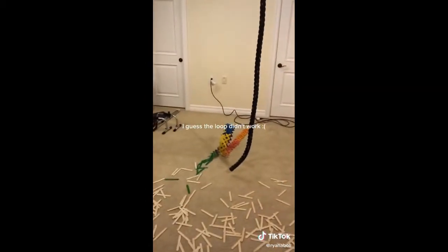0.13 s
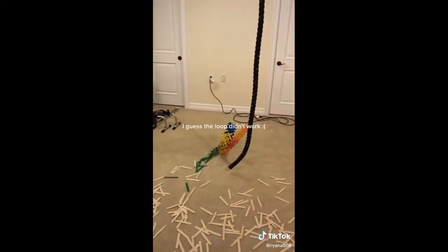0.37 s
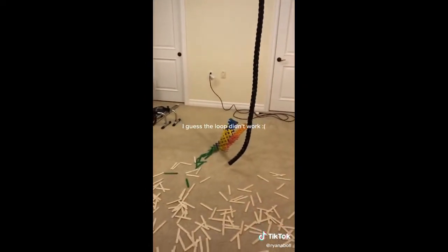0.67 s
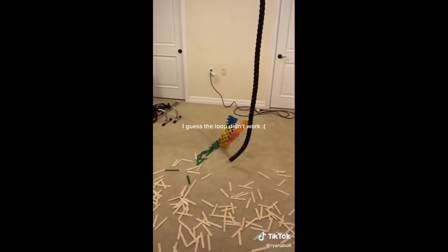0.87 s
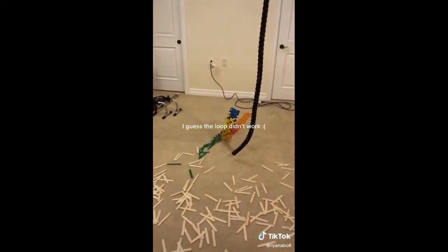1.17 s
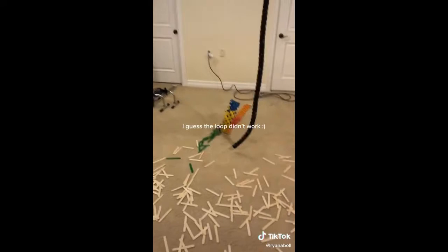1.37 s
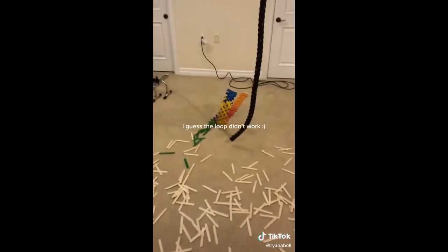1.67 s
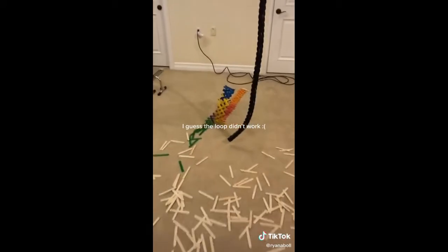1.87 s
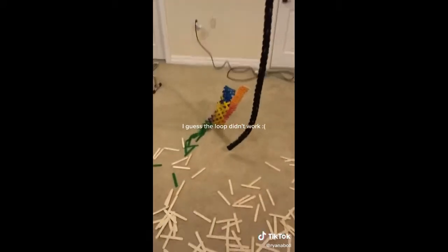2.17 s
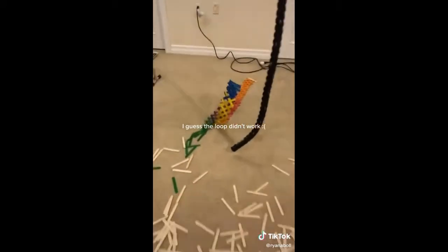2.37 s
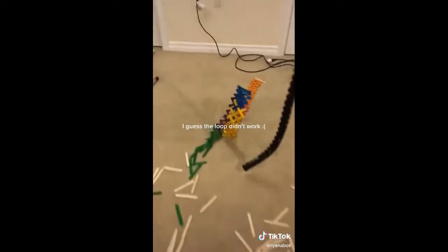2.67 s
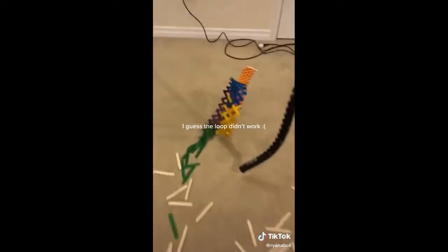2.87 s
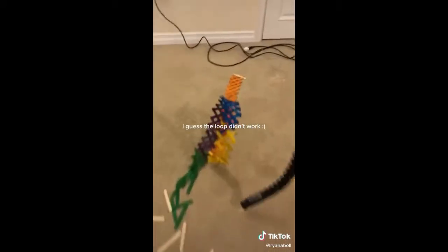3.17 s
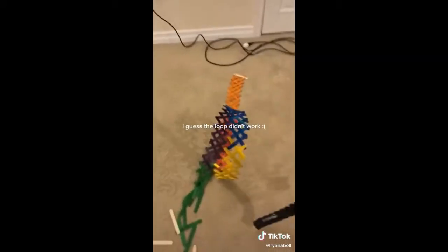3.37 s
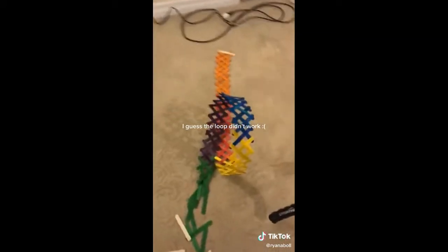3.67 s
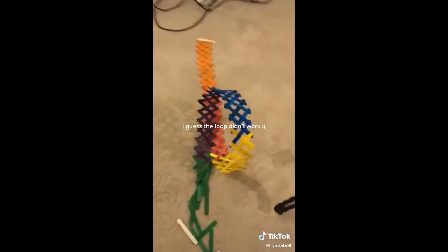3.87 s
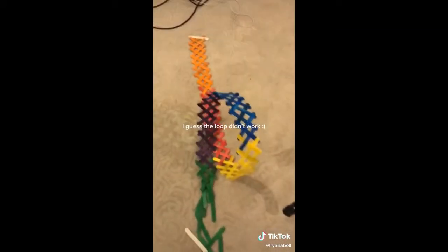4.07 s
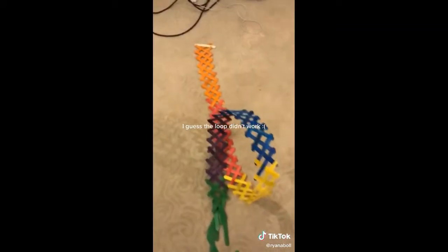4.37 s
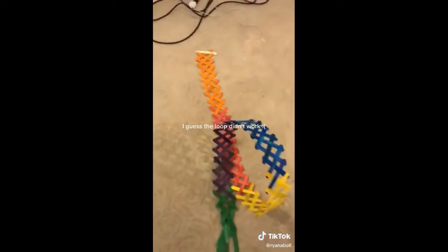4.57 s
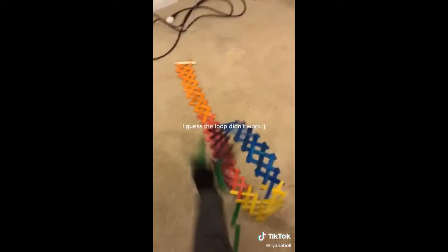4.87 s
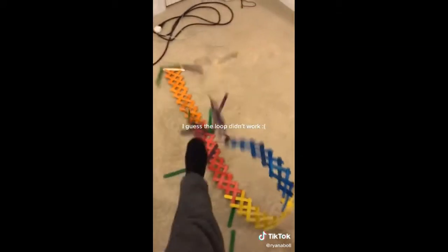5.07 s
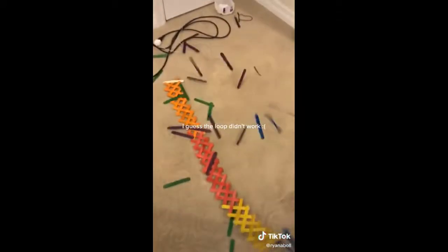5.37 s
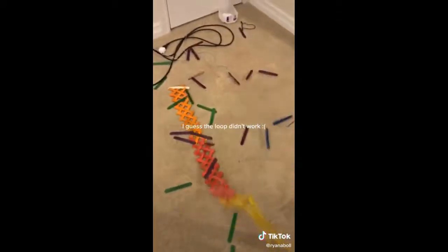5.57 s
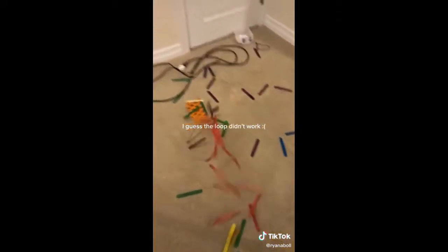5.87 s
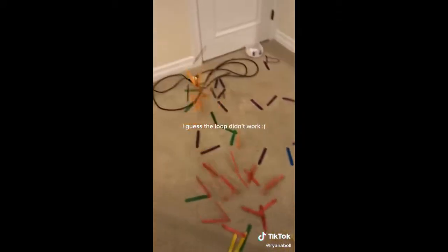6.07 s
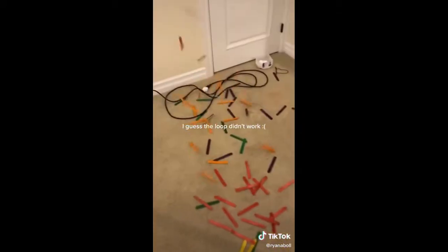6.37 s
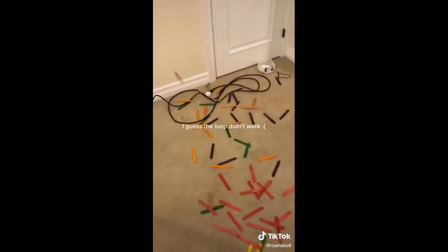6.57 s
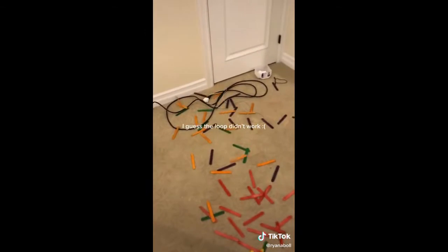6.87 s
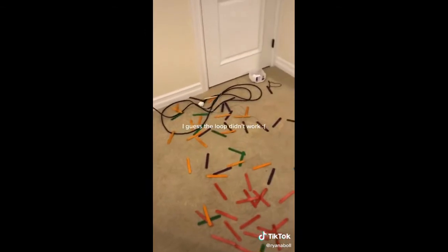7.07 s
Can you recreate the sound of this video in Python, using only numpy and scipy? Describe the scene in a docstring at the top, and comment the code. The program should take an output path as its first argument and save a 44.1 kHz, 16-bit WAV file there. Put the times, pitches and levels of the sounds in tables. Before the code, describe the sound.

A low, quiet room rumble runs throughout. From 0.3 to 2 seconds there are only faint, dull bumps of fingers on the hand-held microphone and soft low rubs. Around 2.4 to 3.1 seconds handling grows busier: clustered knocks, small ticks, cloth slips; a strong thud lands near 3.5. At 3.8 to 4.2 a few crisp wooden clicks and brief scrapes sound as the chain is nudged, then soft footstep rumble. From about 4.7 a foot crunches into it with bright scraping and hard clacks, again near 5.0 to 5.2. The chain springs apart in dense, dry, crackling runs, loudest from 5.4 to 6.3, sticks ringing briefly and pattering dully on carpet, with short lively room echoes. Bursts thin through 6.5 to 6.8, a last light clack comes near 6.9, then quiet and one microphone bump at 7.2.

```python
"""A woven chain of wooden craft sticks lies on a carpet in a small room, under a low, steady room tone of noise.
Fingers bump the hand-held camera (knocks, thumps, ticks) as someone steps up; skin and cloth rub in grainy
slips and footsteps rumble low. A foot scrapes the chain in bright crunches of tiny slips; it lets go and springs
apart in crackling runs. Sticks knock together as ringing modes with a crack and patter on the carpet as soft
impulses, all echoing in the room; a few stragglers land last, and one more bump of the camera follows."""
import sys
import numpy as np
from scipy import signal
from scipy.fft import rfft, irfft
from scipy.io import wavfile
from scipy.ndimage import uniform_filter1d

SR = 44100
rng = np.random.default_rng(int(sys.argv[2]) if len(sys.argv) > 2 else 0)


def waveform_to_disk(signal):
    """Save audio, clipped to [-1, 1], as 16-bit WAV at the path in sys.argv[1]."""
    frames = np.transpose(np.atleast_2d(signal))
    scaled = np.clip(frames, -1, 1) * 32767
    samples = np.round(scaled).astype(np.int16)
    wavfile.write(sys.argv[1], SR, samples)


N = 317946
TIME = np.arange(N) / SR

# colour of wood on wood: (frequency [Hz], relative density [dB per Hz])
WOOD_COLOUR = [(120, -30.5), (200, -31.5), (344, -1.5), (471, -8.5), (645, -1), (947, -13), (1050, -4.5),
               (1440, -12.5), (2040, -0.5), (2520, -4), (5330, -1.5), (6350, -7), (9330, -5), (13000, -5.5)]
# steady run of flying sticks while the chain unravels: (time [s], relative level [dB])
STEADY_RUN = [(4.71, -45.5), (5.03, -43), (5.12, -48.5), (5.45, -42.5), (5.95, -39), (6.2, -44.5),
              (6.49, -58), (6.96, -85)]
# a stretch of the weave lets go at once: (peak [s], relative clatter [dB], relative landings [dB], fade [s])
LET_GO = [(4.779, -30.5, -45, 0.023), (5.28, -59, -44, 0.047), (5.475, -35.5, -37, 0.005),
          (5.64, -34.5, -68, 0.04), (5.69, -42.5, -38, 0.033), (5.977, -28.5, -50, 0.015),
          (6.26, -45.5, -43.5, 0.059), (6.5, -46.5, -48, 0.0087), (6.554, -50, -50, 0.012),
          (6.642, -46, -61.5, 0.095), (6.796, -41.5, -49, 0.04)]
FLURRY_RISE_S = 0.0071


def amp(db):
    """Decibels to gain."""
    return 10 ** (np.asarray(db) / 20)


def unit(x):
    """Scales to an energy of one."""
    return x / np.sqrt(np.sum(x ** 2) + 1e-20)


def evened(x):
    """Scales to an rms of one."""
    return unit(x) * np.sqrt(x.size)


def read(points, hz):
    """Reads a table along log frequency."""
    f, value = np.transpose(points)
    return np.interp(np.log(hz + 1), np.log(f + 1), value)


def level(curve):
    """Gain over time from rows (time [s], level [dB]), practically silent outside them."""
    s, db = np.transpose(curve)
    return amp(np.interp(TIME, s, db, left=-140, right=-140))


def swell(s, db, rise_s, fade_s):
    """Gain over time of one gesture: it grows to its peak, then dies away."""
    distance = np.maximum((s - TIME) / rise_s, (TIME - s) / fade_s)
    return amp(db) * np.exp(-np.minimum(distance, 20))


def add(mix, s, sound):
    """Mixes a sound in at a time."""
    part = mix[max(round(s * SR), 0):][:len(sound)]
    part += sound[:len(part)]


def colour(x, points, size=4096):
    """Causal (minimum-phase) filter of unit energy with the given spectrum, so attacks stay sharp."""
    log_gain = np.log(amp(read(points, abs(np.fft.fftfreq(size, 1 / SR)))))
    minimum_phase = np.exp(np.conj(signal.hilbert(log_gain)))
    taps = np.fft.ifft(minimum_phase).real[:size // 2]
    return signal.oaconvolve(x, unit(taps))[:len(x)]


def impacts(per_s, spread_db, steady_s):
    """Random impulses of uneven size, whose mean power is about one over each short stretch."""
    sizes = amp(spread_db * np.minimum(rng.exponential(1, N), 4)) * rng.choice([-1, 1], N)
    train = sizes * (rng.random(N) < per_s / SR)
    window = signal.windows.hann(int(steady_s * SR) + 3)
    power = abs(signal.oaconvolve(train ** 2, window / window.sum(), "same"))
    return train / np.sqrt(power + 1e-6)


def air(level_db=-57):
    """Steady room tone: noise, mostly a low rumble."""
    # colour of the room tone: (frequency [Hz], relative density [dB per Hz])
    tone_colour = [(15, -45.5), (25, -32.5), (55, 2.5), (81, 3.5), (300, -16.5), (361, -14), (494, -28.5),
                   (609, -24), (1200, -33), (4450, -37.5), (6410, -43), (8550, -43.5), (13000, -46)]
    return amp(level_db) * colour(rng.standard_normal(N), tone_colour)


def shuffle():
    """The moving hand and camera make a low shuffle of many small impulses."""
    # strength of the shuffle: (time [s], level [dB])
    hand_motion = [(0.0, -68.5), (1.75, -62), (2.5, -51.5), (3.0, -56), (3.3, -68.5), (3.6, -57.5),
                   (3.8, -61.5), (5.9, -53), (7.15, -61)]
    # colour of the shuffle: (frequency [Hz], relative density [dB per Hz])
    hand_colour = [(35, -16), (70, -2), (110, 4.5), (170, -6), (290, -1.5), (450, -18.5), (900, -26.5),
                   (6000, -68)]
    return colour(impacts(per_s=280, spread_db=1.5, steady_s=0.15) * level(hand_motion), hand_colour)


def bumps(thump_db=7, tick_db=18, lag_cycles=1.5, thump_hz=80, octaves=0.77,
          rough=0.42, rough_s=0.01, tick_s=0.0026, size=8192):
    """A fingertip pushes the case: an uneven knock, a deep thump that arrives later, and a small tick."""
    # fingers on the camera: (time [s], knock level [dB], knock tuning [Hz],
    # relative thump level [dB], relative tick level [dB])
    pokes = [(0.285, -46.5, 196, -51, -83), (0.811, -48, 178, -54, -83), (1.246, -44.5, 184, -70, -72),
             (1.803, -54, 178, -49.5, -75), (2.055, -47.5, 224, -56, -80), (2.124, -46, 360, -54, -62),
             (2.147, -41.5, 207, -69, -63), (2.416, -39, 299, -53, -59), (2.449, -34.5, 280, -48, -42.5),
             (2.481, -31, 357, -63, -41), (2.504, -28.5, 287, -67, -31), (2.536, -34, 191, -41.5, -49.5),
             (2.599, -29.5, 344, -40.5, -46), (2.657, -42, 312, -63, -53), (2.73, -40.5, 266, -70, -53),
             (2.805, -34.5, 207, -51, -52.5), (2.884, -39, 220, -50, -63), (2.968, -43.5, 335, -62, -75),
             (3.032, -35, 305, -38, -50), (3.056, -30.5, 286, -30.5, -43), (3.32, -37.5, 207, -82, -80),
             (3.407, -32, 370, -68, -58.5), (3.468, -15.5, 290, -35, -39.5), (3.659, -43, 330, -46, -54),
             (4.125, -49, 328, -51, -62), (7.192, -29, 285, -36, -52)]
    # colour of the ticks: (frequency [Hz], relative density [dB per Hz])
    case_colour = [(500, -17), (900, 12), (1600, 4.5), (2600, 9), (3500, -3), (5500, -1), (7000, -20.5),
                   (13000, -18)]
    pushes, ticks = np.zeros((2, N))
    t, f = np.arange(size) / SR, np.fft.rfftfreq(size, 1 / SR) + 1
    lag = np.exp(-2j * np.pi * lag_cycles * np.log(f + 10))  # bending waves: lower is slower

    def thud(centre_hz):
        """A band of bending waves, its low end arriving last."""
        band = np.exp(-.5 * (np.log2(f / centre_hz) / octaves) ** 2)
        return irfft(lag * band / f ** .5)

    for s, knock_db, hz, deep_db, case_db in pokes:
        knock, thump = thud(hz), thud(thump_hz)
        grip, snap = rng.standard_normal((2, size))
        roughness = unit(grip * np.exp(-t / rough_s))
        knock = knock + rough * signal.fftconvolve(knock, roughness)[:size]
        add(pushes, s, amp(knock_db) * knock / abs(knock).max())
        add(pushes, s, amp(deep_db + thump_db) * thump / abs(thump).max())
        add(ticks, s, amp(case_db + tick_db) * unit(snap * np.exp(-t / tick_s)))
    return pushes + colour(ticks, case_colour)


def scuffs(size=16384):
    """Brief swells of friction and footstep rumble, made of many tiny slips; they rise fast and fade slowly."""
    # grainy rubs of fingers, clothing and socks, and low rumbles of footsteps:
    # (onset [s], level [dB], centre [Hz], width [octaves], length [s])
    rubs_and_rumbles = [(0.804, -58, 171, 0.7, 0.3), (1.23, -55, 236, 0.43, 0.25),
                        (1.328, -70.5, 4280, 0.53, 0.16), (1.738, -54.5, 149, 0.34, 0.2),
                        (2.116, -64.5, 650, 0.2, 0.1), (2.427, -48, 706, 0.23, 0.054),
                        (2.496, -44.5, 790, 0.56, 0.038), (2.502, -35.5, 3260, 0.35, 0.011),
                        (2.87, -42, 280, 0.41, 0.083), (3.024, -48, 1180, 1.37, 0.047),
                        (3.029, -53, 3040, 2.03, 0.18), (3.109, -66, 5560, 0.22, 0.031),
                        (3.218, -64.5, 5600, 1.3, 0.093), (3.663, -61, 670, 1, 0.11),
                        (3.744, -53.5, 2580, 1.0, 0.26), (4.28, -49.5, 98, 0.6, 0.33),
                        (4.42, -57, 1110, 0.85, 0.088), (4.518, -58, 4270, 3.7, 0.041),
                        (4.587, -53.5, 89, 0.54, 0.46)]
    out, f = np.zeros(N), np.fft.rfftfreq(size, 1 / SR) + 1
    slips = impacts(per_s=1600, spread_db=3.0, steady_s=0.13)
    for s, db, hz, octaves, length_s in rubs_and_rumbles:
        band = 1 / (1 + (np.log2(f / hz) / octaves) ** 4)
        grain = irfft(rfft(slips[round(s * SR):][:size]) * band)
        progress = np.minimum(np.arange(size) / SR / length_s, 1)
        arch = np.sin(np.pi * progress ** 0.5) ** 2
        add(out, s, amp(db) * evened(grain) * arch)
    return out


def cloth_rubs(gain_db=-1):
    """Sleeve and hand rubbing: cloth fibres catch and slip."""
    # strokes of cloth: (peak [s], relative level [dB], rise [s], fade [s])
    sleeve_strokes = [(2.12, -66, 0.0087, 0.09), (2.445, -52, 0.039, 0.013), (2.605, -55, 0.038, 0.068),
                      (3.02, -62.5, 0.011, 0.09), (3.22, -67.5, 0.24, 0.23), (3.47, -60.5, 0.012, 0.025),
                      (3.7, -54.5, 0.069, 0.028)]
    # colour of the rubbing: (frequency [Hz], relative density [dB per Hz])
    cloth_colour = [(300, -27), (700, 4.5), (1100, -9.5), (1600, -7), (2400, -5.5), (3600, -10.5),
                    (5600, -7.5), (6500, -18.5), (13000, -26.5)]
    motion = sum(swell(*stroke) for stroke in sleeve_strokes)
    return amp(gain_db) * colour(impacts(per_s=1200, spread_db=-3.5, steady_s=0.22) * motion, cloth_colour)


def scrape(gain_db=-2, ring_s=0.0012, count=24, size=512):
    """Tiny slips of wood on wood, each ringing for an instant, make a bright crunch."""
    # sticks sliding over each other, first nudged, then under the foot:
    # (peak [s], relative level [dB], rise [s], fade [s])
    foot_strokes = [(3.799, -54.5, 0.021, 0.086), (3.936, -35, 0.0065, 0.015), (4.0, -42.5, 0.0058, 0.028),
                    (4.175, -44.5, 0.0043, 0.03), (4.5, -71.5, 0.57, 0.56), (4.772, -23.5, 0.023, 0.025),
                    (4.824, -25.5, 0.018, 0.021), (4.935, -32.5, 0.051, 0.059),
                    (5.033, -23.5, 0.009, 0.035), (5.081, -27, 0.002, 0.0069), (5.155, -33, 0.0017, 0.019),
                    (5.201, -25, 0.0018, 0.008), (5.255, -29, 0.03, 0.012)]
    # colour of the sliding: (frequency [Hz], relative density [dB per Hz])
    sliding_colour = [(400, -22), (1100, -19.5), (2100, -11), (3000, -16), (5200, -21), (6900, -7.5),
                      (8200, -5), (9200, 1.5), (10400, -8.5), (11600, -7), (13000, -16.5)]
    motion = sum(swell(*stroke) for stroke in foot_strokes)
    slips = impacts(per_s=1300, spread_db=2.0, steady_s=0.18) * motion
    which, fade = rng.integers(0, count, N), np.exp(-np.arange(size) / SR / ring_s)
    crunch = np.zeros(N)
    for k in range(count):
        ring = unit(rng.standard_normal(size) * fade)
        crunch += signal.oaconvolve(slips * (which == k), ring)[:N]
    return amp(gain_db) * colour(crunch, sliding_colour)


def stick(crack=0.84, crack_s=0.0016, variety=0.1272, contact=0.42, size=2048):
    """One blow: a brief crack, and modes set by this stick's grain and the place where it is struck."""
    # bending and twisting modes: (frequency before detuning [Hz], relative level [dB], t60 [s])
    modes = [(912, -9, 0.027), (1446, -3, 0.026), (2063, -5, 0.017), (3224, -3.5, 0.014), (4294, 1, 0.013),
             (5820, 2, 0.0087), (7075, 2.5, 0.027), (8700, -4.5, 0.069), (9510, 2.5, 0.014),
             (11190, -19.5, 0.022), (11930, 4, 0.021)]
    t = np.arange(size) / SR
    hz, db, t60 = np.transpose(modes)[:, :, None]
    detune, place = rng.standard_normal((2, len(modes), 1))
    tones = np.sin(2 * np.pi * hz * np.exp(variety * detune) * t)
    ring = (place * amp(db - 60 * t / t60) * tones).sum(0)
    blow = unit(ring) + crack * unit(rng.standard_normal(size) * np.exp(-t / crack_s))
    soft = np.clip(contact * rng.standard_normal(), -.7, .7)  # flat faces meet duller than edges
    return unit(signal.lfilter([1], [1, -soft], blow))


def clacks(gain_db=5, direct_db=-2, bounce=0.81, bounce_s=.0036, count=4, size=4096):
    """Each stick hits and chatters a few times, ever weaker. Returns the direct sound and what fills the room."""
    # the loudest single blows: (time [s], relative strength [dB], relative direct sound [dB])
    loud_blows = [(3.7998, -28, 3), (3.877, -31, -1), (3.924, -29, 2), (3.935, -23, 5.5), (4.170, -26, -1),
                  (4.6697, -25.5, 3.5), (4.7151, -23, 1), (4.722, -19.5, 7.5), (4.7347, -24, 10),
                  (4.759, -31, 19), (4.780, -16.5, 14.5), (5.0215, -12, 4), (5.031, -15.5, 9.5),
                  (5.042, -18, 1), (5.081, -16.5, 3), (5.1977, -20.5, 9.5), (5.3113, -15.5, -8),
                  (5.3852, -43.5, 28), (5.415, -11, -1.5), (5.4582, -23, 5), (5.477, -11.5, 9.5),
                  (5.615, -13, -2), (5.6297, -13, 10), (5.657, -21.5, 10), (5.674, -24, 18.5),
                  (5.69, -2.5, 0), (5.7654, -9, 1), (5.844, -17, 2), (5.8613, -7.5, 0), (5.9438, -8, 0),
                  (5.9718, -13.5, 13), (5.9757, -19, 4), (5.984, -2.5, -10), (6.0151, -13, 6.5),
                  (6.064, -10, 7.5), (6.1416, -26.5, 11), (6.1752, -20.5, 6.5), (6.207, -13, 5),
                  (6.245, -8, -5), (6.2492, -7, 6), (6.28, -8, -10), (6.3173, -26, 11), (6.3813, -14.5, 1),
                  (6.4564, -36, 11), (6.497, -19.5, 6), (6.551, -10.5, 1.5), (6.6378, -13, 7),
                  (6.6608, -12, 1.5), (6.6748, -9.5, 1.5), (6.7572, -34, -7), (6.7715, -25.5, 7),
                  (6.897, -24, 1)]
    even_db, brightening = -27, 0.14  # harder blows than even_db [dB] are brighter [dB per octave for each dB]
    direct, sent = np.zeros((2, N))
    octaves = np.log2(np.maximum(np.fft.rfftfreq(size, 1 / SR), 1000) / 6000)
    lead_s = 0.003  # room ahead of the first hit
    for s, db, near_db in loud_blows:
        blow, at = np.zeros(size), lead_s
        for k in range(count):
            add(blow, at, bounce ** k * stick())
            at += bounce_s * rng.uniform(0.4, 1.5)
        tilt = amp(brightening * (db - even_db) * octaves)
        blow = amp(db + gain_db) * unit(irfft(rfft(blow) * tilt))
        add(direct, s - lead_s, amp(near_db + direct_db) * blow)
        add(sent, s - lead_s, blow)
    return colour(direct, WOOD_COLOUR), colour(sent, WOOD_COLOUR)


def clatter(count=200):
    """Hundreds of lighter blows a second, shared among many different sticks."""
    flurries = sum(swell(s, db, FLURRY_RISE_S, fade_s) for s, db, _, fade_s in LET_GO)
    train = impacts(per_s=420, spread_db=4.5, steady_s=0.026) * (level(STEADY_RUN) + flurries)
    which = rng.integers(0, count, N)
    sticks, blows = [stick() for _ in range(count)], np.zeros(N)
    for i in np.flatnonzero(train * (TIME > STEADY_RUN[0][0])):
        add(blows, TIME[i], train[i] * sticks[which[i]])
    return colour(blows, WOOD_COLOUR)


def patter(gain_db=-3, run_db=-17.5, linger=1.32):
    """Soft landings on the carpet: dull impulses that last a little longer than each flurry."""
    # colour of the landings: (frequency [Hz], relative density [dB per Hz])
    carpet_colour = [(90, -30.5), (170, -1.5), (280, 5.5), (420, -0.5), (650, 0.5), (950, -15), (1600, -6),
                     (4000, -58)]
    flurries = sum(swell(s, db, FLURRY_RISE_S, linger * fade_s) for s, _, db, fade_s in LET_GO)
    landing = amp(run_db) * level(STEADY_RUN) + flurries
    return amp(gain_db) * colour(impacts(per_s=220, spread_db=4.5, steady_s=0.13) * landing, carpet_colour)


def floor_knocks(gain_db=-4, fade_s=0.0061, size=4096):
    """A footfall and a few heavier thuds: short knocks on the floor, each a quickly fading sine."""
    # footfall and heavier thuds: (time [s], relative level [dB], ring [Hz])
    thuds = [(4.798, -23.5, 1392), (5.275, -25, 780), (5.288, -28, 226), (5.66, -28.5, 420),
             (6.257, -27, 660), (6.794, -28.5, 178)]
    out, t = np.zeros(N), np.arange(size) / SR
    for s, db, hz in thuds:
        add(out, s, amp(db + gain_db) * np.sin(2 * np.pi * hz * t) * np.exp(-t / fade_s))
    return out


def echoes(early=0.98, early_s=0.0059, gap_s=.002, size=22050):
    """The room heard from one spot: sparse echoes off door and walls, then a tail that dies band by band."""
    # decay of the room: (frequency [Hz], t60 [s])
    decay = [(150, 0.66), (800, 0.24), (2500, 0.34), (6000, 0.25), (13000, 0.11)]
    t = np.arange(size) / SR
    hz, at, bands = signal.stft(rng.standard_normal(size), SR, nperseg=256)
    fading = bands * amp(-60 * at / read(decay, hz)[:, None])
    tail = signal.istft(fading, SR, nperseg=256)[1][:size]
    first = rng.standard_normal(size) * (rng.random(size) < 1500 / SR) * np.exp(-t / early_s)
    heard = t > gap_s
    return unit(unit(tail * heard) + early * unit(first * heard))


def room(x, count=6, size=512):
    """Sticks fly everywhere, so each moment echoes from a randomly chosen spot."""
    spot = np.repeat(rng.integers(0, count, N // size + 1), size)[:N]
    wet = np.zeros(N)
    for k in range(count):
        share = np.sqrt(abs(uniform_filter1d(1. * (spot == k), size // 2)))  # smooth hand-over
        wet += signal.oaconvolve(x * share, echoes())[:N]
    return wet


def scene(dry_db=-2, wet_db=-2, scrape_wet_db=-4, bump_wet_db=-21, air_side_db=-4, spread_hz=4250):
    """Sticks, steps, handling and their echoes; only the treble differs between left and right."""
    # spread of the treble: (time [s], relative side level [dB])
    side_width = [(2.5, -15), (3.1, -8.5), (4.2, -12.5), (4.8, -6), (5.25, -7), (5.6, -10.5), (6.2, -33.5),
                  (6.9, -25.5)]
    direct, sent = clacks()
    flying = clatter() + patter() + floor_knocks()
    sliding, handling = scrape(), bumps()
    rubbing = cloth_rubs() + shuffle() + scuffs()
    mid = direct + amp(dry_db) * flying + sliding + handling
    to_room = amp(wet_db) * (sent + flying) + amp(scrape_wet_db) * sliding + amp(bump_wet_db) * handling
    mid = mid + room(to_room) + rubbing + air()
    width = amp(np.interp(TIME, *np.transpose(side_width)))
    side_source = room(sent + flying + sliding + rubbing) * width + amp(air_side_db) * air()
    treble_only = signal.firwin(511, spread_hz, pass_zero=False, fs=SR)
    side = signal.oaconvolve(side_source, treble_only, "same")
    return np.array([mid + side, mid - side])


def record(dry, bass_hz=45, edge_hz=13150):
    """The small microphone loses the deepest bass; then a steep filter limits the treble."""
    thin = signal.sosfilt(signal.butter(3, bass_hz, "high", fs=SR, output="sos"), dry)
    band_limit = signal.firwin(511, edge_hz, window=("kaiser", 8), fs=SR)
    return signal.oaconvolve(thin, band_limit[None], "same", axes=1)


dry = scene()
out = record(dry)
waveform_to_disk(out)
```